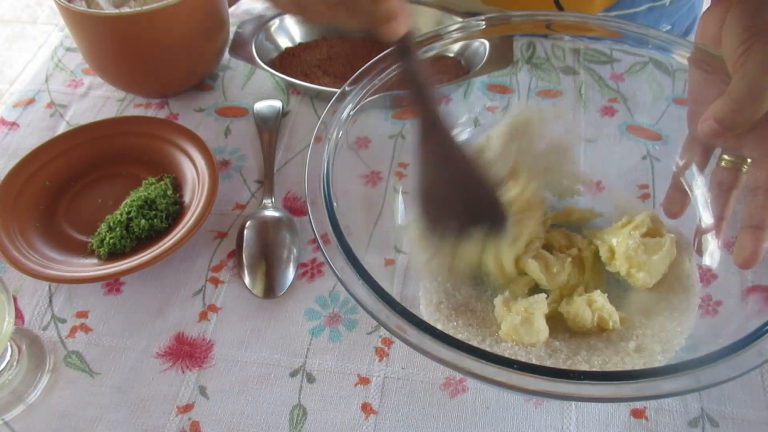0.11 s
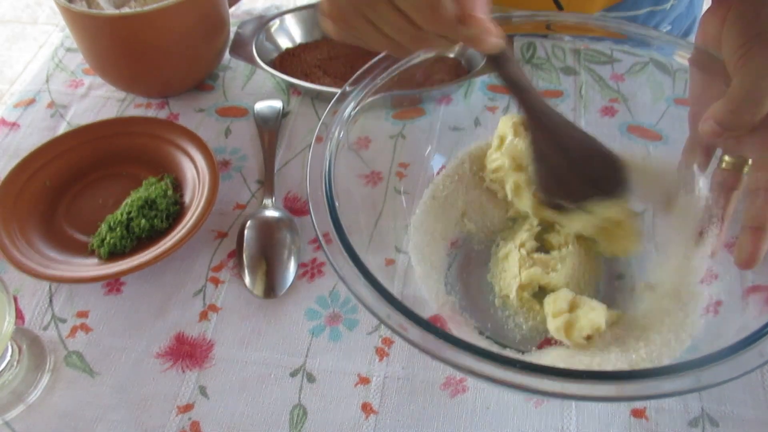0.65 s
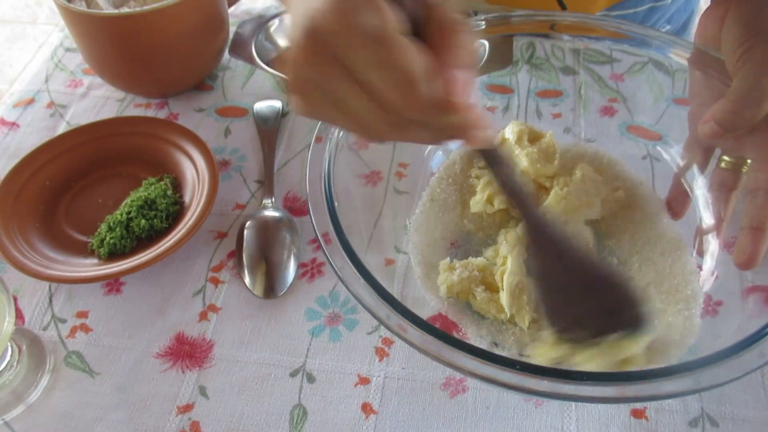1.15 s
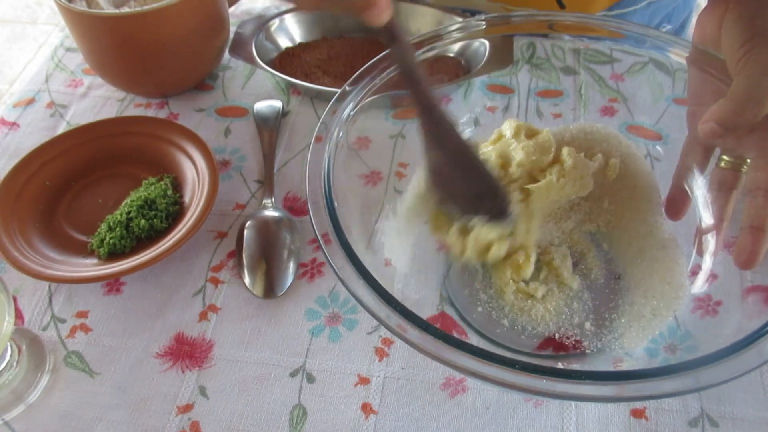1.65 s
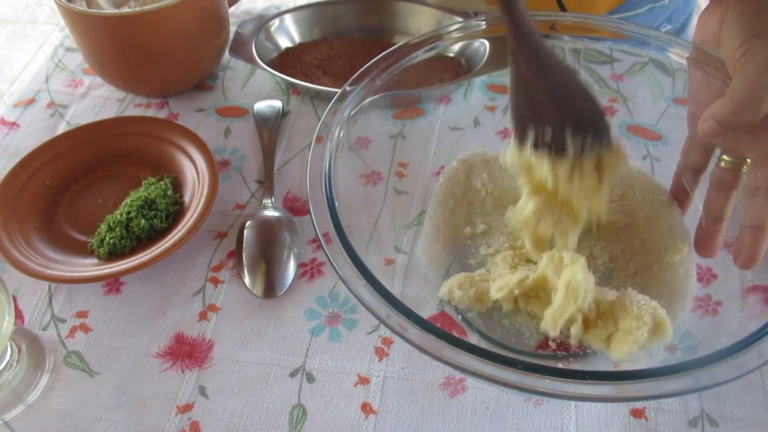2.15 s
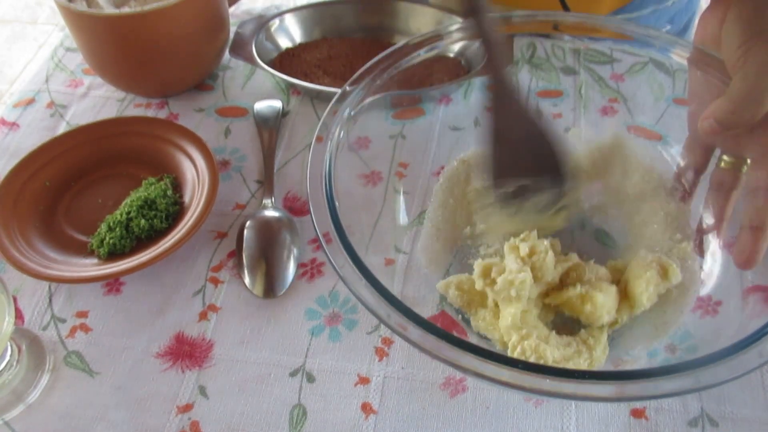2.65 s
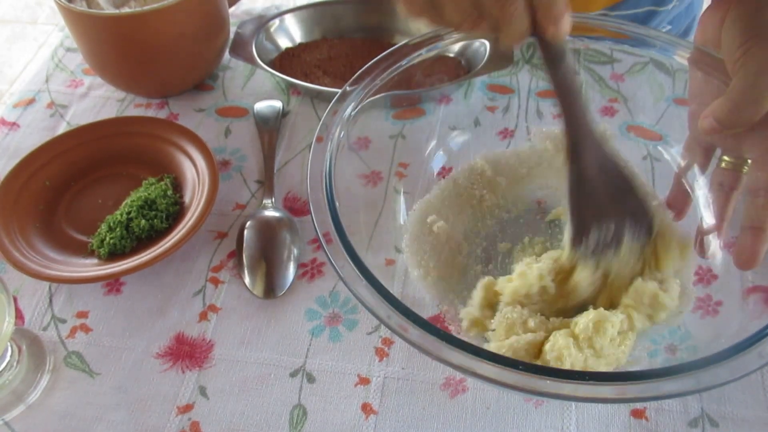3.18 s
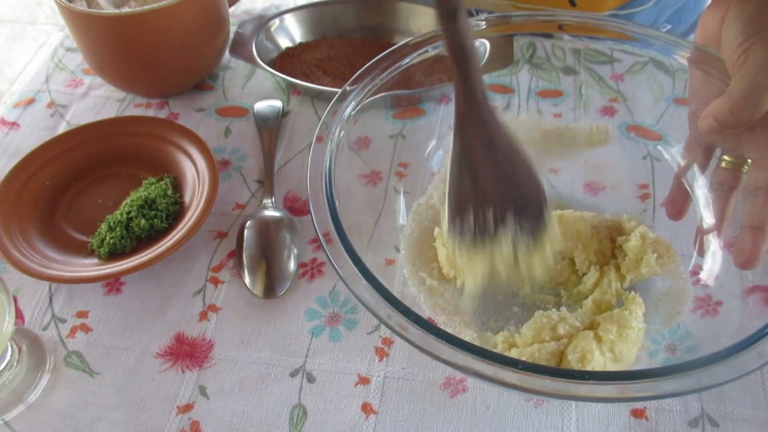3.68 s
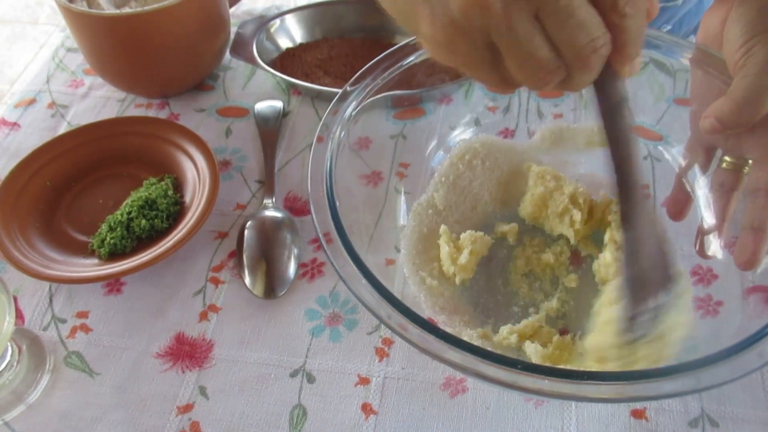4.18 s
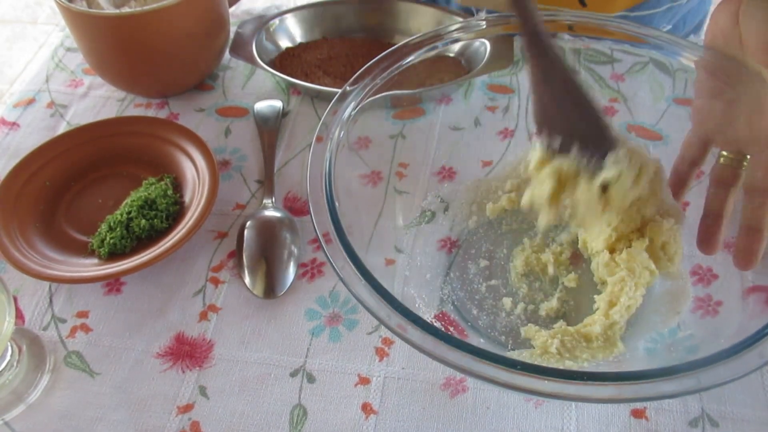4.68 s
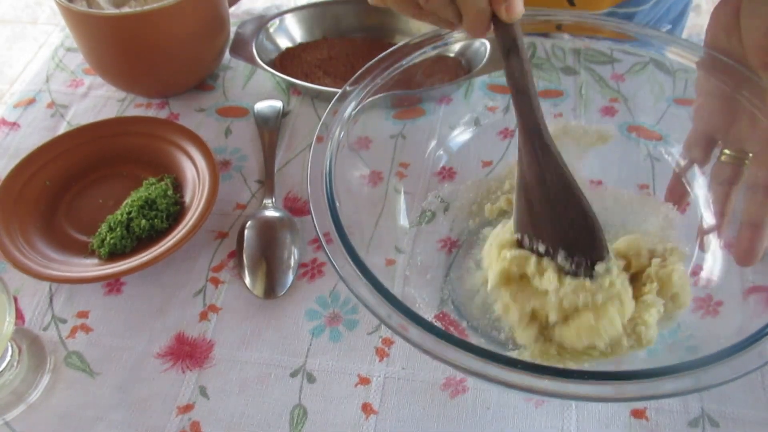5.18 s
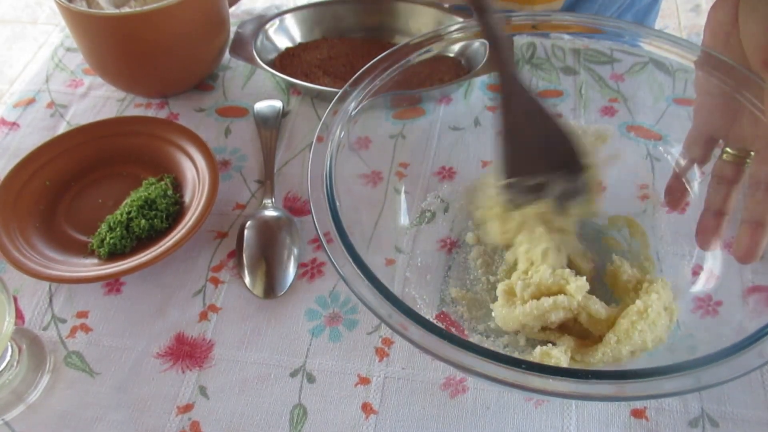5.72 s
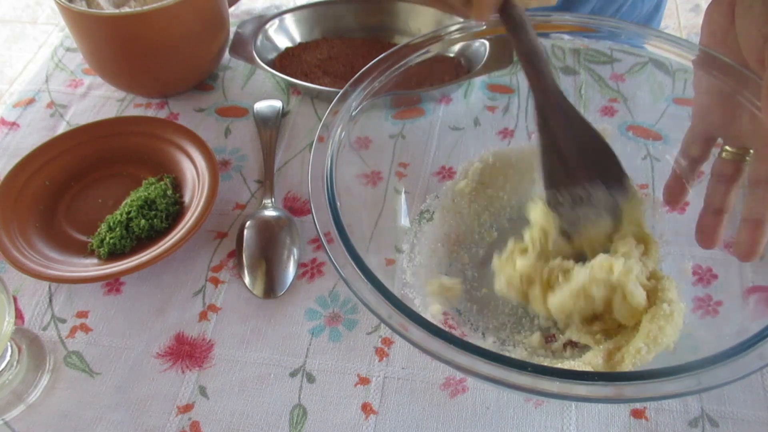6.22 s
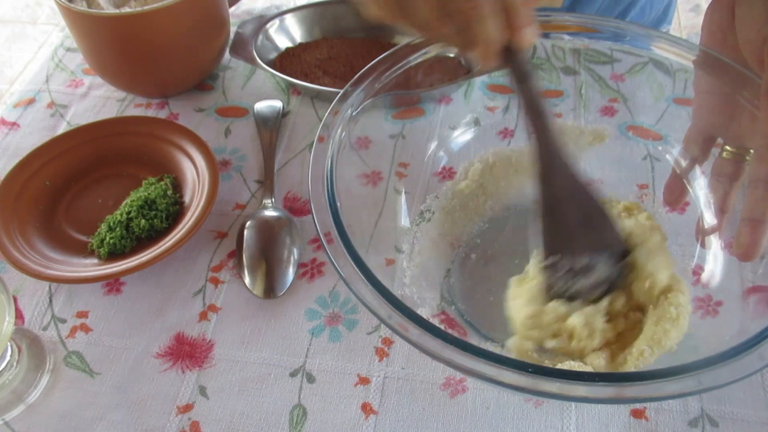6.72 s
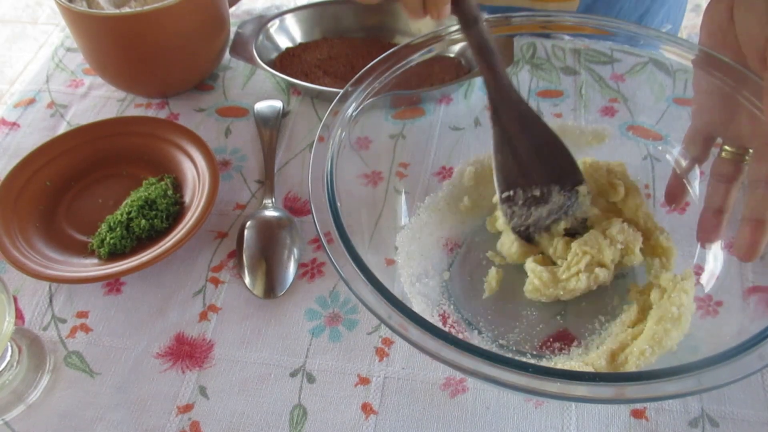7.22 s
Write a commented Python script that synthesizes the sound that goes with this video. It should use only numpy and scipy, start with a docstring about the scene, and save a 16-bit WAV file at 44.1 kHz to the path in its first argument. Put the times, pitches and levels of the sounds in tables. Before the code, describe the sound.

Close to the microphone, a wooden spatula works butter and coarse sugar in a glass bowl. Short gritty scrapes and bright crystal cracks mix with dull, butter-damped knocks, loudest a little after two and four seconds. Low thumps and air rumble swell mid-way and near the end. Two tiny distant bird whistles slip through the steady hiss of a fairly dry room.

```python
"""Sugar grit crunches as a wooden spatula creams it with butter in a glass bowl on a cloth-covered table.
Cracking crystals and friction noise excite the resonances of bowl and blade; brief contact forces give
knocks on the butter-damped glass, breaking sugar lumps and table thuds. Puffs of air buffet the
microphone as low noise and short thumps, a far bird whistles as gliding sines, and shaped noise makes
the room hiss. A sparse decaying echo follows the near sounds."""
import sys
import numpy as np
from scipy import signal
from scipy.fft import rfft, irfft, next_fast_len
from scipy.io import wavfile
from scipy.ndimage import uniform_filter1d

SR = 44100
rng = np.random.default_rng(int(sys.argv[2]) if len(sys.argv) > 2 else 0)


def master(y):
    """Save y as 16-bit WAV."""
    cut = np.clip(np.atleast_2d(y).T, -1, 1)
    pcm = np.round(cut * 32767)  # scale
    wavfile.write(sys.argv[1], SR, pcm.astype(np.int16))


def gain_from_decibels(decibels):
    """Convert decibel values to linear amplitude factors."""
    exponent = np.asarray(decibels, float) / 20
    return 10 ** exponent


N = 324135

# Relative spectrum of room and microphone noise: frequency_hz, density_db (per Hz)
HISS_SPECTRUM = [(18, -27), (30, 3), (120, 3.5), (369, 2.5), (639, 0), (921, -0.5), (1470, -2.5),
                 (2020, -2), (2990, -7.5), (4420, -12), (7080, -8.5), (14000, -14.5), (15500, -14.5)]
# Decay of the room echo: frequency_hz, t60_s
ROOM_DECAY = [(200, 0.66), (1000, 0.22), (4000, 0.24), (12000, 0.068)]
# Bird whistles, one list each: time_s, pitch_hz, level_db
WHISTLES = [
    [(2.43, 7100, -62), (2.46, 7350, -60), (2.52, 7200, -68)],
    [(4.068, 4480, -62), (4.082, 4700, -52), (4.102, 4690, -51), (4.115, 4400, -54)],
    [(4.125, 3850, -60), (4.16, 4000, -58), (4.178, 4080, -51), (4.2, 4200, -58)],
]
# Relative spectrum of moving air at the microphone: frequency_hz, density_db (per Hz)
AIR_SPECTRUM = [(12, -35), (20, 1), (60, 5), (102, -2.5), (135, -5), (258, -12.5), (357, -22.5), (500, -23),
                (650, -47), (1100, -120)]
# Level of the air rumble: time_s, level_db
RUMBLE_LEVEL = [(0.0, -57), (0.76, -54), (1.06, -50), (1.23, -57), (1.58, -53), (1.76, -72), (2.58, -60),
                (2.78, -52), (3.28, -52.5), (3.81, -60), (3.97, -60), (4.22, -52), (4.36, -38), (4.52, -39),
                (4.97, -43.5), (5.22, -56.5), (5.89, -62.5), (6.92, -44.5), (7.02, -58), (7.35, -45.5)]
# Low thumps, from air or jolts through the table: centre_s, peak_db, pitch_hz
PUFFS = [(0.007, -28, 90), (0.022, -32, 80), (0.49, -34.5, 100), (0.753, -31.5, 85), (0.834, -33, 101),
         (0.889, -34, 119), (1.024, -34, 119), (1.146, -29.5, 101), (1.18, -37, 110), (1.251, -35, 98),
         (1.551, -36, 152), (2.062, -32.5, 90), (2.3, -33, 82.5), (2.727, -27.5, 116), (2.748, -32, 115),
         (2.77, -35, 110), (3.075, -32, 121), (3.115, -34, 110), (3.135, -35, 100), (3.156, -33, 84),
         (3.433, -30.5, 108), (4.166, -33.5, 108), (4.234, -29, 104), (4.316, -34, 85), (4.365, -24, 90),
         (4.393, -22.5, 120), (4.435, -21.5, 110), (4.472, -33, 98), (4.563, -22, 213), (4.617, -15, 193),
         (4.643, -28, 94), (4.712, -28, 110), (4.834, -30, 116), (4.954, -28.5, 106), (5.066, -23, 166),
         (5.084, -30, 48.3), (5.123, -23.5, 106), (5.585, -35, 124), (6.44, -34, 70), (6.667, -20.5, 128),
         (6.745, -24.5, 103), (6.797, -18.5, 115), (6.826, -23, 124), (7.06, -35, 112)]
# One mode of the table, a single row: frequency_hz, width_hz, thud_db (under a 0 dB knock)
TABLE_MODE = (127.8, 13.4, -31.5)
# Modes of the damped bowl: frequency_hz, width_hz, gain_db
BOWL_MODES = [(420, 30, -4), (634, 69, 2.5), (726, 105, 1.5), (1180, 102, 4), (1500, 56, -2),
              (1830, 104, -13), (2182, 52, -12.5)]
# Modes of the blade: frequency_hz, width_hz, gain_db
BLADE_MODES = [(3060, 150, -6), (4900, 250, -14), (7050, 300, -17)]
# Relative spectrum of crushed grit: frequency_hz, density_db (per Hz)
GRIT_SPECTRUM = [(880, -5), (1500, -1.5), (2090, -8.5), (3000, -4.5), (4350, -7.5), (4890, -4), (5830, 1),
                 (11700, -0.5), (14300, -5), (15500, -15)]
# Blade striking glass: contact_s, glass_peak_db, low_hz, upper_hz, upper_gain_db (of the upper response)
KNOCKS = [(0.077, -19, 664, 1060, 14), (0.095, -25, 640, 1120, -1), (0.215, -29.5, 660, 1470, -24),
          (0.447, -23, 610, 1150, -19), (0.468, -32, 576, 1240, -23), (0.72, -26.5, 751, 1210, -7),
          (0.736, -16.5, 662, 1060, -29), (0.95, -12.5, 574, 1160, -9), (1.011, -21.5, 710, 1550, -15),
          (1.218, -31, 584, 1200, -11), (1.311, -28.5, 630, 1420, -13), (1.545, -20.5, 600, 1290, -16),
          (2.053, -10.5, 626, 1060, 7), (2.281, 0.5, 670, 1180, 17), (2.291, -12, 654, 2030, 21),
          (2.363, -22, 744, 1180, 2), (2.622, -22.5, 613, 1170, -26), (2.712, -13.5, 625, 1130, 5),
          (2.8, -12, 704, 1110, -24), (2.963, -15, 666, 1150, 7), (3.078, -22, 710, 1180, -16),
          (3.293, -18, 697, 1180, -7), (3.368, -17, 644, 1100, -30), (3.416, -11.5, 730, 1130, -2),
          (3.625, -17.5, 670, 1180, -25), (3.961, -22.5, 710, 1260, -25), (4.217, -8, 640, 1480, 13.5),
          (4.465, -23.5, 516, 1660, -13), (4.92, -25.5, 727, 1170, -14), (4.941, -21.5, 760, 1110, -7),
          (5.191, -12, 770, 1160, 11), (5.196, -14.5, 690, 1220, -20), (5.447, -22.5, 830, 1500, 1),
          (5.454, -20, 736, 1500, 31), (5.548, -26.5, 681, 1140, 1), (5.573, -12.5, 700, 1870, 2),
          (5.71, -24.5, 636, 1520, 33), (5.793, -18.5, 784, 1150, 7), (5.859, -21, 716, 1130, -23),
          (6.0, -25, 830, 1480, 12), (6.031, -9, 706, 1400, 17), (6.036, -12, 641, 1230, 6),
          (6.067, -19, 607, 1490, 18), (6.294, -21.5, 616, 1560, 31), (6.325, -19.5, 644, 1150, 22),
          (6.41, -28, 719, 1420, 6), (6.427, -24.5, 690, 1430, -12), (6.671, -20.5, 664, 1410, 13),
          (6.88, -26, 750, 1180, -2), (6.999, -16.5, 630, 1150, 12), (7.061, -22, 624, 1130, -30),
          (7.186, -19.5, 627, 1410, 26)]
# Sugar lumps breaking: contact_s, peak_db, tick_hz, snap_over_tick_db, contact_ms
CRACKS = [(0.0715, -18.5, 3900, -9, 3.9), (0.2054, -22, 5650, -5, 1.1), (0.2215, -24, 6680, 10, 2.6),
          (0.1337, -26, 4930, -3, 1.9), (0.3088, -28, 4690, -8, 2.0), (0.3311, -30, 4200, -18, 1.8),
          (0.4, -28, 3240, -3, 1.4), (0.4673, -25, 5000, -8, 1.7), (0.7188, -17.5, 4000, -6, 1.4),
          (0.9498, -12.5, 3520, 1, 2.1), (0.9867, -19, 4250, -11, 1.3), (1.0105, -13.5, 4270, 2, 3.3),
          (1.2133, -13, 4180, 0.5, 4), (1.3044, -23.5, 4270, -6, 1.5), (1.5423, -19.5, 4680, -2, 4.2),
          (1.6197, -21, 5350, -18, 1.4), (1.6384, -16.5, 6400, -5, 1.5), (1.6498, -18, 3900, -5, 1.6),
          (1.6777, -26, 4100, 0.0, 2.9), (2.0533, -16.5, 7200, 1, 2.1), (2.089, -20.5, 2970, -3, 2.9),
          (2.2805, -8.5, 4440, -2.5, 1.35), (2.363, -23, 5200, 2, 2.4), (2.5696, -28.5, 3990, 17, 1.2),
          (2.6219, -20.5, 3220, -2, 1.5), (2.636, -21, 4500, -6, 1.2), (2.659, -15.5, 3810, -13, 0.64),
          (2.6762, -17, 4060, -4, 2.7), (2.7162, -19.5, 3900, -3, 2.3), (2.7934, -19, 4460, -6, 5.5),
          (2.9619, -12, 2770, 4.5, 1.3), (3.0619, -21, 4800, -4, 1.4), (3.1448, -18.5, 3000, -5, 1.2),
          (3.2889, -18.5, 3600, 1, 1.7), (3.4171, -14.5, 4730, -3, 1.3), (3.474, -13.5, 3360, 2, 3.3),
          (3.5111, -18, 2800, -5, 1.8), (3.5937, -21.5, 2860, -14, 1.8), (3.9602, -19.5, 3830, -3, 2),
          (4.2174, -4.5, 4770, 1.5, 2.4), (4.2274, -20, 6590, 0, 2.6), (4.2348, -25, 5210, 7, 1.5),
          (4.4633, -23, 3230, 7, 3.9), (4.9407, -27, 2470, 1, 2.2), (5.1934, -14, 6600, 5, 1.6),
          (5.2124, -22, 5070, 0.0, 3), (5.548, -29, 2980, 3, 2.0), (5.5701, -12, 2900, -2, 2.3),
          (5.7934, -20.5, 3030, -7, 2.2), (5.8435, -21, 3140, -8, 1.6), (6.0307, -14.5, 4800, 3, 2.1),
          (6.0688, -28, 3040, -2, 2), (6.4077, -13.5, 3100, -30, 3.7), (6.425, -30, 2950, 2, 1.6),
          (6.4426, -19.5, 3100, -20, 3.3), (6.7195, -21, 3000, -7, 2.2), (6.998, -21, 2980, -2, 4.4),
          (7.0204, -20.5, 3070, -2, 2.1)]
# Blade dragged through grit: start_s, length_s, grit_db, bowl_db, ring_db, ring_hz (as the blade bends)
STROKES = [(-.05, 0.3, -41, -49.5, -43, 3930), (0.287, 0.33, -40.5, -55.5, -45, 4030),
           (0.66, 0.1, -43.5, -57, -46.5, 3870), (0.793, 0.063, -53, -67, -69, 3500),
           (0.98, 0.048, -45.5, -46.5, -44.5, 4020), (1.025, 0.047, -48.5, -65, -39.5, 3050),
           (1.25, 0.11, -44.5, -54.5, -46.5, 4180), (1.55, 0.12, -56, -49, -67, 3550),
           (1.63, 0.12, -46.5, -53.5, -55, 4050), (1.72, 0.048, -53, -65, -48.5, 3800),
           (1.933, 0.065, -51.5, -71, -74, 3600), (2.064, 0.037, -40.5, -44, -43.5, 3350),
           (2.331, 0.031, -49, -51, -48, 4000), (2.546, .06, -65, -55, -58, 3700),
           (2.63, 0.057, -46, -46.5, -43, 4130), (2.716, 0.053, -41.5, -43.5, -42, 3070),
           (2.838, 0.068, -46, -48, -47, 3460), (2.956, 0.22, -41, -44.5, -40.5, 3160),
           (3.26, 0.11, -42.5, -63, -40.5, 3300), (3.412, .1, -42, -40, -44.5, 3070),
           (3.589, 0.051, -37, -43.5, -55, 3300), (3.953, 0.055, -43.5, -56, -46, 3450),
           (4.24, 0.16, -46.5, -51.5, -57, 3600), (4.418, 0.23, -46.5, -54.5, -51, 3400),
           (4.824, 0.02, -44.5, -62, -56, 3320), (4.902, 0.077, -41.5, -54, -49, 3130),
           (5.1, 0.017, -45.5, -58, -70, 3300), (5.188, 0.049, -48, -48, -39.5, 3260),
           (5.415, 0.28, -45.5, -49, -45, 3300), (5.564, 0.054, -42.5, -50, -37, 2770),
           (5.716, .08, -42, -50, -43, 3300), (5.792, 0.12, -42.5, -51.5, -38.5, 3060),
           (5.98, 0.043, -42, -63, -52, 3320), (6.07, 0.14, -42, -48, -40.5, 3050),
           (6.27, 0.07, -41, -51, -61, 3080), (6.391, 0.096, -47.5, -45.5, -44.5, 3060),
           (6.524, 0.096, -46.5, -70, -41.5, 3260), (6.668, 0.094, -46, -48, -39, 3140),
           (6.824, 0.12, -44, -55, -43, 3370), (7.009, 0.063, -42, -37, -47.5, 2970),
           (7.125, .1, -43.5, -53, -41.5, 3230)]

HISS_DB, ECHO_DB = -49.5, -21
WAVER = 0.012  # rms share of a whistle's pitch
SMALL_PUFFS_PER_S, SMALL_PUFF_OVER_RUMBLE_DB = 11, 4.5  # the second is the least excess
PUFF_RISE_TURNS, PUFF_FALL_TURNS, PUFF_SAG = 0.31, 0.78, 0.16  # sharp start, sinking pitch
LEAD_MS = 15  # each contact's sound begins this long before the contact itself
KNOCK_MS, KNOCK_MS_PER_DB = 2.57, 0.08  # contact of a 0 dB knock; harder knocks touch longer
PUSH_DB, PUSH_PER_DB = 18, 0.72  # hard blows are one clean push, light ones mostly rattle
THUD_PER_DB = 1.03  # dB of thud per dB of knock
CRUMBS_PER_S, CRUMB_OVER_GRIT_DB, CRUMB_SPREAD_DB = 30, 13, 2.5  # small lumps; least excess over the grit
BITE_DB_PER_S, SAG_DB_PER_S, LIFT_DB_PER_S = 425, 18.5, 190  # a stroke bites in, slackens, lifts off
REST_DB = -63.5  # butter sliding between strokes


def evened(x):
    """Normalisation: scales a signal to rms 1."""
    return x / np.sqrt(np.mean(x ** 2) + 1e-20)


def read(points, hz):
    """Interpolates a spectrum along a logarithmic frequency axis."""
    f, value = np.transpose(points)
    return np.interp(np.log(hz + 1), np.log(f + 1), value)


def add(mix, s, sound):
    """Superposition: adds a sound to the mix from time s."""
    part = mix[max(round(s * SR), 0):][:len(sound)]
    part += sound[:len(part)]


def shaped(x, response):
    """Linear filtering: multiplies the spectrum by a function of frequency."""
    size = next_fast_len(len(x))
    return irfft(rfft(x, size) * response(np.fft.rfftfreq(size, 1 / SR)), size)[:len(x)]


def with_spectrum(x, points):
    """Spectral shaping: weights a signal by a table of levels over frequency."""
    return shaped(x, lambda hz: gain_from_decibels(read(points, hz)))


def slow_noise(window):
    """Low-pass noise: averages white noise twice over a window in samples, to rms 1."""
    once = uniform_filter1d(rng.standard_normal(N), window)
    return evened(uniform_filter1d(once, window))


def modes(table, near_hz=None, octaves=1, lift_db=0):
    """Modal superposition: sums resonances; a contact point lifts the modes near its own frequency."""
    def response(hz):
        total = 0
        for f, width, db in table:
            if near_hz:
                db = db + lift_db * np.exp(-(np.log2(f / near_hz) / octaves) ** 2)
            total = total + gain_from_decibels(db) * width * hz / (width * hz + 1j * (hz ** 2 - f ** 2))
        return total
    return response


def resonate(x, hz, width):
    """Heterodyne resonance: shifts the curve hz down to zero, smooths, and shifts back."""
    turn = np.exp(2j * np.pi * np.cumsum(hz) / SR)
    r = np.exp(-np.pi * width / SR)
    return 2 * (turn * signal.lfilter([1 - r], [1, -r], x / turn)).real


def hiss():
    """Stationary noise: random pressure with the spectrum of room and microphone."""
    return gain_from_decibels(HISS_DB) * evened(with_spectrum(rng.standard_normal(N), HISS_SPECTRUM))


def room(x):
    """Reverberation: sparse echoes of random sign, each frequency dying at its own rate."""
    taps = np.zeros(SR // 2)
    at = np.arange(300, SR // 2 - 20, 20)
    taps[at + rng.integers(0, 20, len(at))] = rng.choice([-1., 1.], len(at))
    hz, t, z = signal.stft(taps, SR, nperseg=256)
    t60 = np.maximum(read(ROOM_DECAY, hz), .02)[:, None]
    tail = signal.istft(z * gain_from_decibels(-60 * t / t60), SR, nperseg=256)[1]
    return signal.fftconvolve(x, tail / np.linalg.norm(tail))[:N]


def bird():
    """Frequency modulation: far whistles are thin sines whose pitch glides and wavers."""
    out = np.zeros(N)
    for rows in WHISTLES:
        s, hz, db = np.transpose(rows)
        t = np.arange(s[0], s[-1], 1 / SR)
        waver = 1 + WAVER * evened(uniform_filter1d(rng.standard_normal(len(t)), 120))
        cycles = np.cumsum(np.interp(t, s, hz) * waver) / SR
        tone = np.sqrt(2) * np.sin(2 * np.pi * cycles)
        add(out, s[0], gain_from_decibels(np.interp(t, s, db)) * tone * signal.windows.tukey(len(t), .3))
    return out


def puff(hz, turn):
    """Transient pressure pulse: a cycle or two at a sinking pitch, rising faster than it falls."""
    turns = np.arange(-int(2 * SR / hz), int(2 * SR / hz)) * hz / SR
    envelope = np.exp(-(turns / np.where(turns < 0, PUFF_RISE_TURNS, PUFF_FALL_TURNS)) ** 2)
    return envelope * np.cos(2 * np.pi * (turns - PUFF_SAG * turns ** 2 + turn))


def air():
    """Turbulence at the microphone: a lumpy low rumble and single soft thumps."""
    lumpy = rng.standard_normal(N) * gain_from_decibels(3.7 * slow_noise(900))
    rumble_db = np.interp(np.arange(N) / SR, *np.transpose(RUMBLE_LEVEL))
    out = gain_from_decibels(rumble_db) * evened(with_spectrum(lumpy, AIR_SPECTRUM))
    small = [(a * N / SR, rumble_db[int(a * N)] + SMALL_PUFF_OVER_RUMBLE_DB + 6 * b, 80 + 55 * c)
             for a, b, c in rng.random((round(SMALL_PUFFS_PER_S * N / SR), 3))]
    puffs = PUFFS + small
    for (s, db, hz), turn in zip(puffs, rng.random(len(puffs))):
        start = s - 2 / hz
        add(out, start, gain_from_decibels(db) * puff(hz, turn)[max(round(-start * SR), 0):])
    return out


def contact(contact_ms, db, push, rebound_db, chance):
    """Impact force: weak yielding of grit around the touch, a push, a few ms of rattle, a rebound."""
    ms = np.arange(len(chance)) * 1000 / SR - LEAD_MS
    span = max(contact_ms, .4)
    rattle = np.exp(-((ms - 0.86 * span) / span) ** 2 * np.where(ms < .8 * span, 1.6, 1))
    yielding = gain_from_decibels(min(-47 - db, -8)) * np.exp(-abs(ms) / 19.5)  # offsets the touch's own level, up to a cap
    # the rebound grows slower than the blow
    rebound = gain_from_decibels(rebound_db - 0.44 * db) * np.exp(-((ms - 12) / 5.8) ** 2) * (ms > 0)
    blow = np.exp(-((ms - .5 * span) / .07) ** 2)
    return chance * (rattle + yielding + rebound) + push * blow


def table_thud(db, samples):
    """Damped oscillation: a knock sets one low mode of the table decaying."""
    hz, width, thud_db = TABLE_MODE
    t = np.maximum(np.arange(samples) / SR - LEAD_MS / 1000, 0)
    return gain_from_decibels(thud_db + THUD_PER_DB * db) * np.sin(2 * np.pi * hz * t) * np.exp(-np.pi * width * t)


def knock(db, low_hz, upper_hz, upper_db, chance):
    """Modal excitation: the spot struck on the glass favours a low and an upper note; the table thuds."""
    low = modes([(low_hz, 200, 0)] + BOWL_MODES, low_hz, 0.16, lift_db=28.5)
    upper = modes([(upper_hz, 250, 0)] + BOWL_MODES, upper_hz, 0.25, lift_db=14)
    # only hard blows reach the rim's high note
    rim = modes(BOWL_MODES[-1:], BOWL_MODES[-1][0], lift_db=47.0 + 7.8 * db)
    push = gain_from_decibels(PUSH_DB + PUSH_PER_DB * db)
    force = contact(KNOCK_MS + KNOCK_MS_PER_DB * db, db, push, -25.5, chance)

    def glass_response(f):
        radiated = f ** 2 / (f ** 2 + 480 ** 2)  # a small bowl moves little air at low pitch
        return radiated * (low(f) + gain_from_decibels(upper_db) * upper(f) + rim(f))

    glass = shaped(force, glass_response)
    return gain_from_decibels(db) * glass / abs(glass).max() + table_thud(db, len(chance))


def crack(db, hz, snap_db, contact_ms, chance):
    """Brittle fracture: a lump of sugar gives way with a pitched tick and a wide-band snap."""
    force = contact(contact_ms, db, 0, -23.5, chance)
    tick = shaped(force, modes([(hz, 0.08 * hz, 0)] + BLADE_MODES, hz, 0.077, lift_db=4))
    snap = with_spectrum(force, GRIT_SPECTRUM)
    both = evened(tick) + gain_from_decibels(snap_db) * evened(snap)
    return gain_from_decibels(db) * both / abs(both).max()


def crumbs():
    """Random fracture: small lumps of random time, pitch and contact, as loud as the stroke allows."""
    grit_db = strokes()[0]
    rows = []
    for a, b, c, d, e in rng.random((round(CRUMBS_PER_S * N / SR), 5)):
        db = grit_db[int(a * N)] + CRUMB_OVER_GRIT_DB - CRUMB_SPREAD_DB * np.log(1 - .95 * b)
        rows.append((a * N / SR, db, 2900 * gain_from_decibels(5.0 * c), -8 + 12 * d, .6 + 1.6 * e))
    return rows


def knocks():
    """Superposed impacts: every knock and crack, each driven by its own noise."""
    out = np.zeros(N)
    for table, sound in ((KNOCKS, knock), (CRACKS + crumbs(), crack)):
        for (s, *row), chance in zip(table, rng.standard_normal((len(table), 3000))):
            add(out, s - LEAD_MS / 1000, sound(*row, chance))
    return out


def strokes():
    """Friction envelope: one stroke shape sets grit, bowl and ring levels; ring pitch glides between."""
    t = np.arange(N) / SR
    power = np.full((3, N), gain_from_decibels(2 * REST_DB))
    for s, length, *levels_db, _ in STROKES:
        shape_db = (-BITE_DB_PER_S * np.maximum(s - t, 0) - SAG_DB_PER_S * np.clip(t - s, 0, length)
                    - LIFT_DB_PER_S * np.maximum(t - s - length, 0))
        near = shape_db > -40
        power[:, near] += gain_from_decibels(2 * (shape_db[near] + np.array(levels_db)[:, None]))
    s, length, *_, hz = np.transpose(STROKES)
    return *(10 * np.log10(power)), np.interp(t, s + length / 2, hz)


def grains(per_s, spread_db, low_hz, high_hz, cycles):
    """Shot noise: crystals crack at random, each a few cycles at one of 16 pitches; a few are large."""
    struck = rng.random(N) < per_s / SR
    size = gain_from_decibels(spread_db * np.minimum(rng.exponential(1, N), 3.5)) * struck
    kind, out = rng.integers(0, 16, N), np.zeros(N)
    for k, hz in enumerate(np.geomspace(low_hz, high_hz, 16)):
        turns = np.arange(256) * hz / SR
        grain = turns * np.exp(-turns / cycles) * np.sin(2 * np.pi * turns)
        out += signal.oaconvolve(size * (kind == k), grain)[:N]
    return evened(out)


def scrape():
    """Friction-driven resonance: grit crackles in the air and rings bowl and blade; the blade judders."""
    grit_db, bowl_db, ring_db, ring_hz = strokes()
    judder = gain_from_decibels(1.46 * slow_noise(500))
    rub = rng.standard_normal(N)
    fine = judder * (grains(1500, 4.6, 2350, 11400, cycles=0.5) + rub)
    coarse = judder * (grains(400, 3.96, 539, 3420, cycles=0.82) + 1.88 * rub)
    grit = evened(with_spectrum(fine, GRIT_SPECTRUM))
    table = evened(shaped(rub, modes([TABLE_MODE])))
    bowl = evened(shaped(coarse, modes(BOWL_MODES))) + 0.44 * table
    blade_hz = BLADE_MODES[0][0]
    sharp = np.exp(-((ring_hz - blade_hz) / 170) ** 2)  # near its own note the blade rings clearly
    wide = evened(resonate(coarse, ring_hz, 1400))
    clear = evened(shaped(judder * coarse, modes(BLADE_MODES, blade_hz, .3, lift_db=1.0)))
    ring = (1 - .8 * sharp) * wide + sharp * clear
    return gain_from_decibels(grit_db) * grit + gain_from_decibels(bowl_db) * bowl + gain_from_decibels(ring_db) * ring


def scene():
    """Superposition at the microphone: near sounds with their echo, bird, air and hiss."""
    near = scrape() + knocks()
    return (near + gain_from_decibels(ECHO_DB) * room(near) + bird() + air() + hiss())[None]


def band_limit(x):
    """A steep low-pass at the top of the band."""
    return signal.sosfilt(signal.butter(12, 16320, fs=SR, output="sos"), x)


def record(dry):
    """Band limitation: a linear-phase low-pass at 15150 Hz removes the highest treble."""
    edge = signal.firwin(601, 15150, window=("kaiser", 5), fs=SR)
    mix = signal.oaconvolve(dry, edge[None], "same")
    return band_limit(mix)


dry = scene()
out = record(dry)
master(out)
```